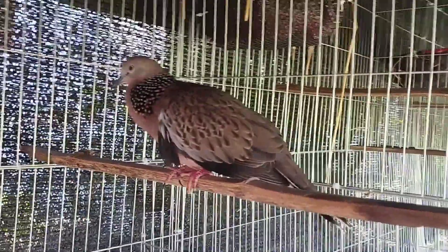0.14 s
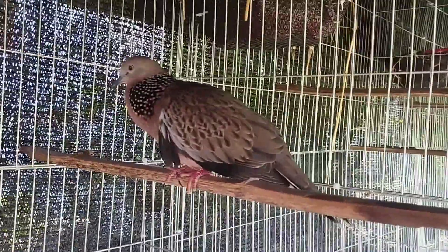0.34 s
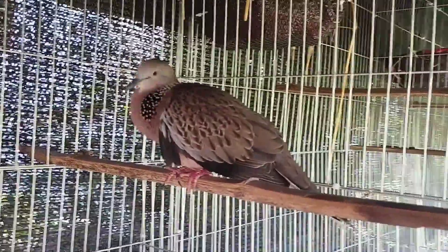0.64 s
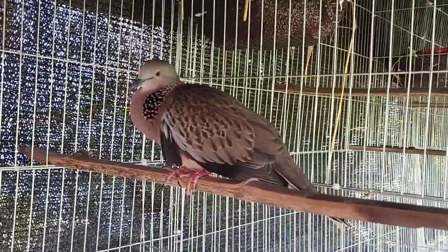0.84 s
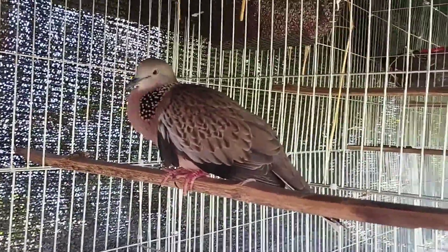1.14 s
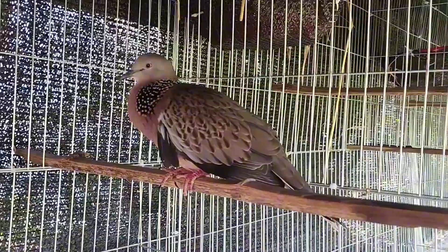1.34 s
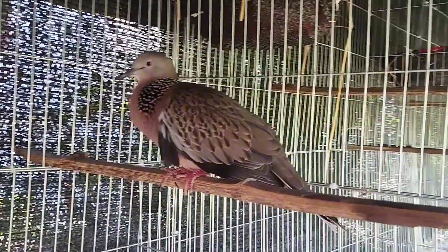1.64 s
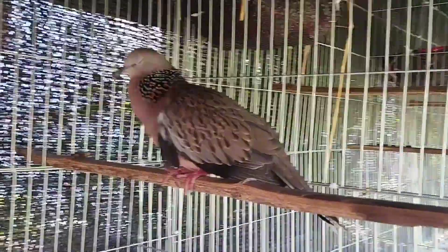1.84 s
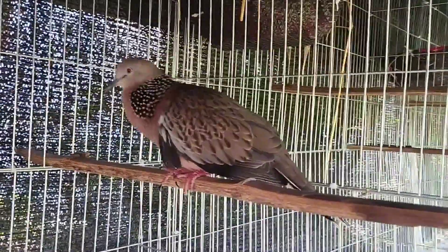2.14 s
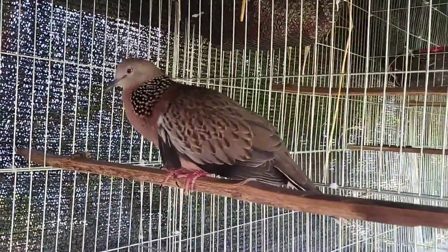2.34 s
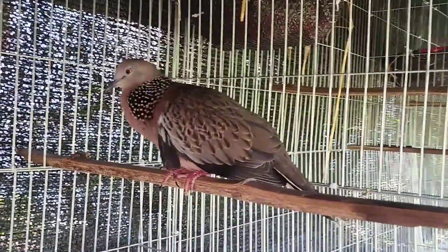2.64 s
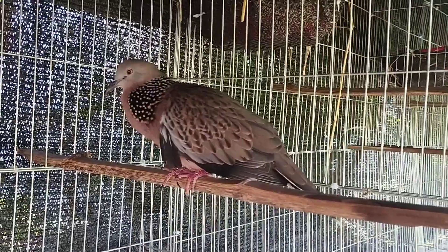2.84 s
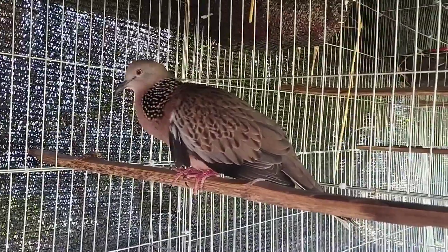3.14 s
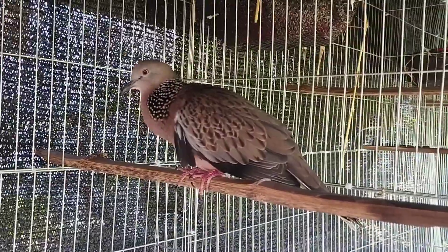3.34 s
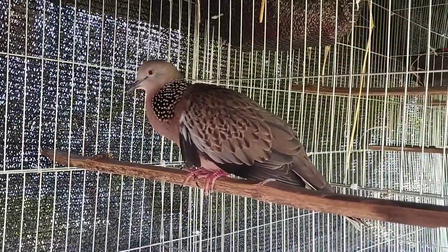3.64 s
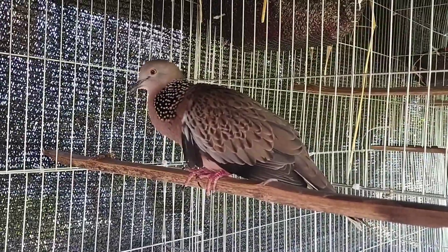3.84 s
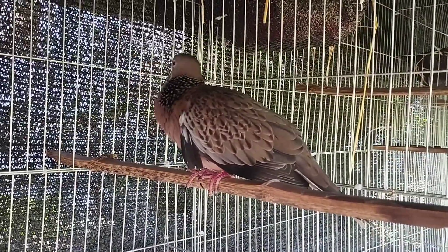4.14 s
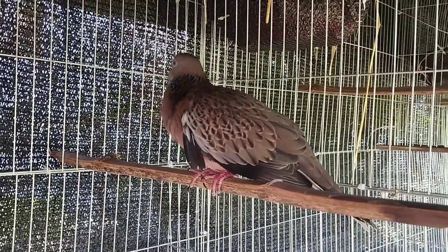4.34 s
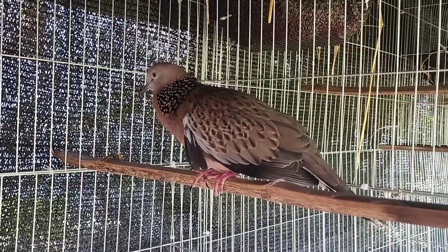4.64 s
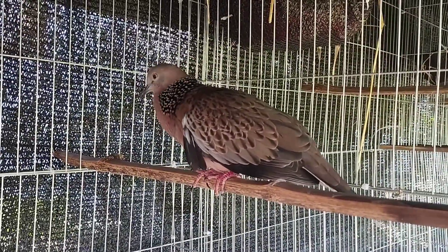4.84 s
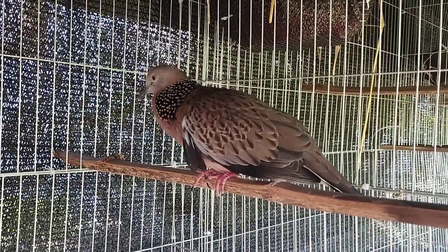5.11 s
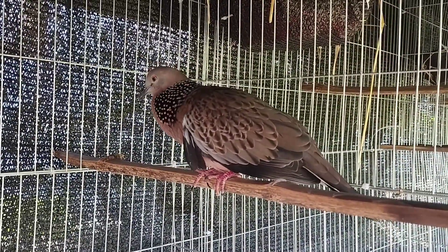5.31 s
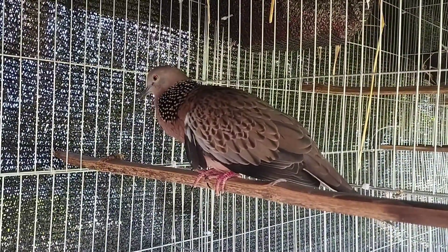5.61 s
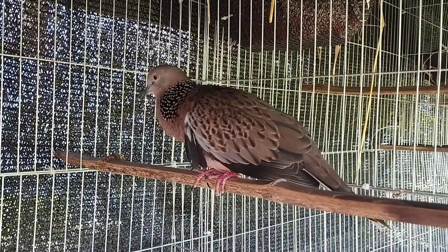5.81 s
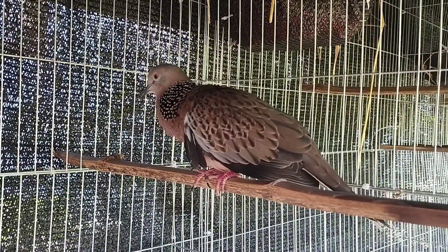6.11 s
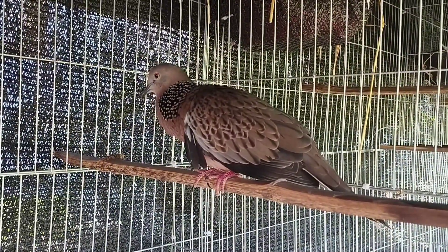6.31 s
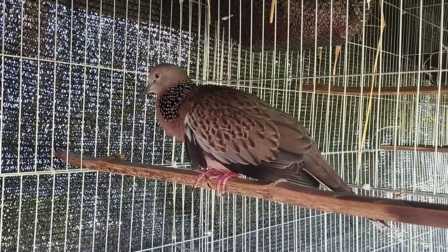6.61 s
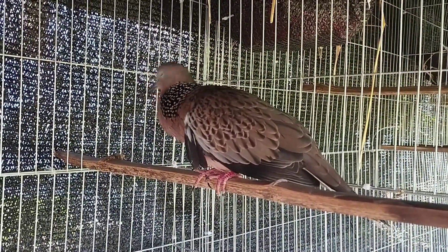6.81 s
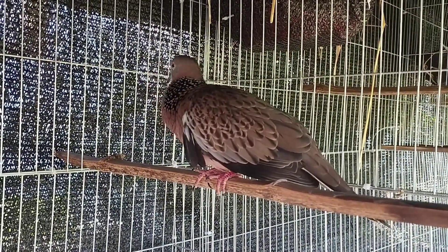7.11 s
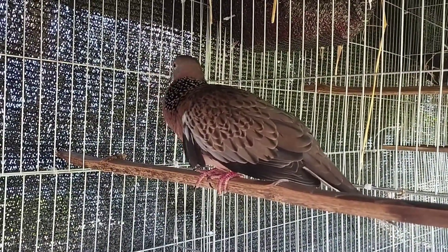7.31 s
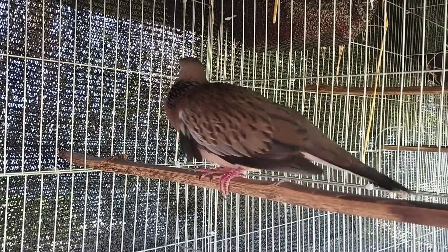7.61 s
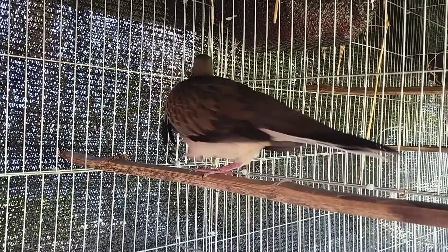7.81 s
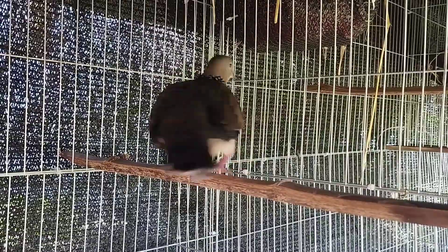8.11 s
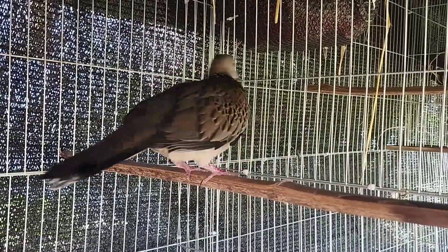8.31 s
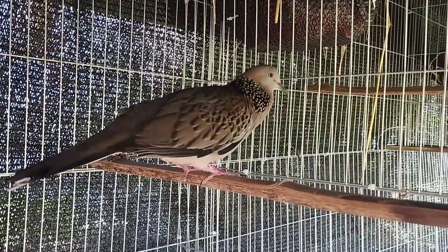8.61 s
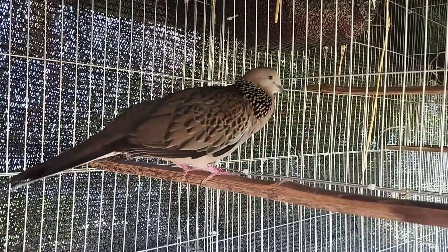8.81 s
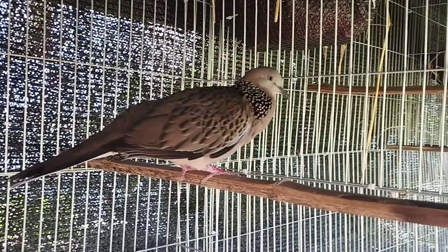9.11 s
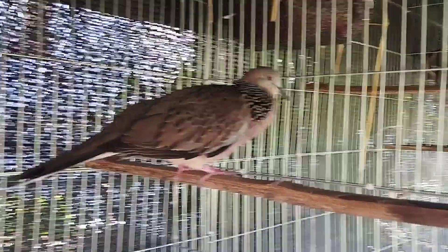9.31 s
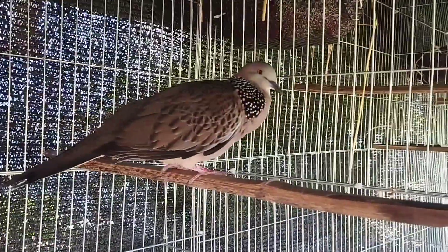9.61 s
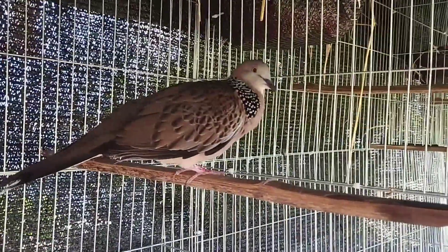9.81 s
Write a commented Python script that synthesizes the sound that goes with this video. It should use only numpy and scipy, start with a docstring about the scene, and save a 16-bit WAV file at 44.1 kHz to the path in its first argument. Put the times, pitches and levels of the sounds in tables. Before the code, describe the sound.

A spotted dove close by in an outdoor wire cage finishes a purring coo, then calls three two-note phrases: a short rolled note swelling upward, then a longer purr that sags in pitch. Soft low wind thumps shift between left and right, with few after the middle. Tiny wire ticks, faint distant chirps and a thin insect hiss fill the pauses. Stereo microphone, bird slightly left, short echo.

```python
"""A dove in an outdoor wire cage is heard first amid a long purring coo; cage wires tick as wind gusts set in.
Near 1.9, 4.5 and 8.6 s comes a rising rolled note, each time followed by a long purring one.
Its voice is a near sine that the syrinx chops into pulses; nearby walls ring on after it.
Gusts, low noise shaped apart for each microphone, last to 7.5 s; far birds, gliding sines, chirp between,
and one peeps six times from 6.7 s. Air noise and a thin insect band, both filtered noise, lie under it all."""
import sys
import numpy as np
from scipy import signal
from scipy.fft import rfft, irfft
from scipy.io import wavfile
from scipy.ndimage import uniform_filter1d

SR = 44100
rng = np.random.default_rng(int(sys.argv[2]) if len(sys.argv) > 2 else 0)


def voltage_ratio(level):
    """Linear amplitude factor for a level in decibels (scalar or array-like)."""
    return 10 ** (np.asarray(level, float) / 20)


def int16_out(signal):
    """Quantize to a 16-bit WAV file."""
    q = np.round(np.clip(np.atleast_2d(signal).T, -1, 1) * 32767)
    wavfile.write(sys.argv[1], SR, q.astype(np.int16))


N = 438794

# overtones escaping through the closed beak: [f/Hz, level relative to the tone/dB before waver and facing]
OVERTONES = [(900, -37), (1050, -29), (1250, -49), (1500, -51.5), (1950, -59), (2130, -62), (2300, -47),
             (2550, -62), (2800, -54), (3500, -65), (5000, -61.5), (5600, -66.5), (6150, -56.5),
             (6800, -76.5), (9000, -99)]
# where the bird is heard from: [t/s, left over right/dB, left ahead/ms,
# overtone level/dB as the head faces or turns away]
BEARING = [(0, 4.5, 0.14, -2), (2.4, 4, 0.18, 0.5), (5, 3.5, 0.16, -2.5), (8.5, 3, 0.022, -5.5),
           (9.95, 4, .01, -5.5)]
# rising notes: [start t/s, length/s, hump and trough level change/dB, crest level change/dB, dip t/s]
RISING_NOTES = [(1.915, 0.35, 0.5, 0.3, 2.1901), (4.476, 0.37, -0.5, -1, 4.7665),
                (8.551, 0.369, -3.5, 1, 8.8703)]
# purring notes: [start t/s, length/s, level change/dB, level gained by the end/dB,
# pitch ratio reached by the end, share of length at which the level's knee falls]
PURRING_NOTES = [(-.117, 0.54, -0.15, 1.36, 1.032, 0.77), (2.378, 0.54, -0.57, 1.65, 1.031, .78),
                 (4.954, 0.539, 0.1, 0, .985, 0.73), (9.037, 0.55, -0.4, 0.5, 1.03, 0.72)]


def rms_one(x):
    """Normalization to unit root mean square."""
    return x / np.sqrt(np.mean(x ** 2) + 1e-20)


def in_time(rows):
    """Linear interpolation of every column over the scene's time axis."""
    s, *columns = np.transpose(rows)
    return [np.interp(np.arange(N) / SR, s, column) for column in columns]


def at_hz(points, hz):
    """A spectral curve, interpolated on a logarithmic frequency axis."""
    curve_hz, value = np.transpose(points)
    return np.interp(np.log(hz), np.log(curve_hz), value)


def band(x, low_hz, high_hz):
    """Band-pass filtering with a maximally flat passband."""
    edges_hz = [low_hz, min(high_hz, SR / 2.2)]
    return signal.sosfilt(signal.butter(2, edges_hz, "band", fs=SR, output="sos"), x)


def drift(rate_hz):
    """Slow random fluctuation of unit rms: noise through a double-pole low-pass, at one value per 40 samples."""
    r = np.exp(-80 * np.pi * rate_hz / SR)
    white = rng.standard_normal(N // 40 + 2002)
    slow = signal.lfilter([1], [1, -2 * r, r * r], white)[2000:]   # the filter's start is dropped
    return np.interp(np.arange(N) / 40, np.arange(len(slow)), rms_one(slow))


def resonance(x, hz, width_hz):
    """A damped resonator: the pole radius sets its bandwidth and so its decay."""
    r = np.exp(-np.pi * width_hz / SR)
    zeros = [(1 - r * r) / 2, 0, (r * r - 1) / 2]
    poles = [1, -2 * r * np.cos(2 * np.pi * hz / SR), r * r]
    return signal.lfilter(zeros, poles, x + 1e-18)


def sides(pan_db):
    """Level difference between the channels, split evenly about the middle."""
    return voltage_ratio(np.multiply.outer([.5, -.5], pan_db))


def air():
    """Broadband noise as a sum of narrow bands, each with its own level, flicker and channel correlation."""
    # still air, far traffic and hiss: [f/Hz, relative level per Hz/dB]
    air_spectrum = [(18, -29), (30, 2), (75, -6.5), (390, -24), (624, -26), (833, -28), (901, -30),
                    (1780, -34.5), (4000, -35.5), (4810, -37.5), (5340, -42.5), (8110, -48.5),
                    (10800, -50.5), (12700, -52), (15600, -42)]
    # left-right likeness: [f/Hz, correlation]
    likeness = [(60, 0.71), (240, 1), (950, 0.03), (3770, 0.049), (15000, 0.17)]
    air_db = -58
    out, edges = 0, np.geomspace(30, 17000, 23)
    white = rng.standard_normal((2, 2, N))
    for k, (low, high) in enumerate(zip(edges, edges[1:])):
        mid, side = band(white[k % 2], low, high)
        hz = np.sqrt(low * high)
        alike = np.clip(at_hz(likeness, hz), -1, 1)
        gain = voltage_ratio(at_hz(air_spectrum, hz) + 0.27 * drift(3))
        out = out + gain * (np.sqrt(1 + alike) * mid + np.sqrt(1 - alike) * side * [[1], [-1]])
    return voltage_ratio(air_db) * rms_one(out)


def insects():
    """Narrow-band noise: a thin far hiss whose level wavers slowly."""
    # far insects: [t/s, level/dB before the waver]
    insect_level = [(0, -92), (5, -89), (6, -90.5), (7.5, -86), (8.6, -88.5), (9.95, -86)]
    centre_hz, width_hz, waver_db = 5420, 170, 0.86
    hiss = band(rng.standard_normal((2, N)), centre_hz - width_hz / 2, centre_hz + width_hz / 2)
    return voltage_ratio(in_time(insect_level)[0] + waver_db * drift(1.6)) * rms_one(hiss)


def wind_split(pan_db):
    """Power sharing between the microphones by their level difference, with a common lift of 4 dB."""
    return voltage_ratio(4.0) / np.sqrt(1 + voltage_ratio(np.multiply.outer([-2, 2], pan_db)))


def wind():
    """Turbulent pressure at each microphone: lumpy low noise in a deep and an upper band, swelled by gusts."""
    # wind between gusts: [t/s, deep level/dB before the common lift, left over right/dB]
    steady_wind = [(0, -53, 5.5), (.4, -57.5, 0.5), (.8, -51.5, 5), (1.05, -50, -2), (1.45, -44, -12),
                   (1.8, -46, -3.5), (2, -46, 6.5), (2.4, -53.5, 0), (3.3, -56, -2), (3.7, -53, 3),
                   (4.4, -58.5, 0.5), (5.2, -55, -3.5), (5.7, -57.5, -5.5), (5.95, -48.5, -10),
                   (6.3, -50.5, -2.5), (6.6, -54, -1), (7.7, -57.5, 2), (9.95, -62, 4)]
    # gusts: [peak t/s, deep level/dB and left over right/dB, upper rumble level/dB], levels before the lift
    gusts = [(.82, -48, 2.5, -58.5), (.89, -43, 4, -62), (1.125, -63, 2, -54.5), (1.18, -42, -12, -63),
             (1.33, -42, -12, -81), (1.44, -42, -20, -80), (1.66, -36, -17.5, -68), (1.97, -38.5, 14, -66),
             (2.271, -56, 20, -81), (2.631, -47.5, 38.5, -74), (2.77, -49, -5, -74.5),
             (3.51, -31.5, 21.5, -70.5), (4.78, -52, -7.5, -74.5), (5.32, -40.5, -12.5, -74.5),
             (5.819, -34, -24, -75), (6.051, -43.5, -17, -75), (6.15, -44, -16, -84), (6.21, -45, -11, -81),
             (6.39, -44.5, -11, -75), (7.01, -45, 4, -68.5), (7.46, -47.5, 1.5, -74.5)]
    gust_rise_s, gust_fall_s = 0.012, 0.027
    upper_db, upper_follows = -73.5, 0.092   # upper rumble, and the share of the wind's dB swing it follows
    level_db, pan_db = in_time(steady_wind)
    swing_db = level_db - level_db.mean()
    deep = (voltage_ratio(level_db) * wind_split(pan_db)) ** 2
    upper = (voltage_ratio(upper_db + upper_follows * swing_db) * wind_split(pan_db)) ** 2
    near = np.arange(-SR // 5, SR // 5)
    swell = np.exp(-(near / SR / np.where(near < 0, gust_rise_s, gust_fall_s)) ** 2)
    for s, gust_db, gust_pan_db, gust_upper_db in gusts:
        power = swell * wind_split(gust_pan_db)[:, None] ** 2
        span = round(s * SR) + near
        deep[:, span] += voltage_ratio(2 * gust_db) * power   # doubled dB, as powers add
        upper[:, span] += voltage_ratio(2 * gust_upper_db) * power
    lumps = voltage_ratio([3.2 * drift(18), 3.2 * drift(18)])
    white = rng.standard_normal((2, 2, N))
    low = np.sqrt(deep) * rms_one(band(band(white[0], 4.7, 70), 3.3, 120))
    high = np.sqrt(upper) * rms_one(band(band(white[1], 110, 370), 110, 370))
    return lumps * (low + high)


def birds():
    """Frequency modulation: gliding whistles, whose pitch a random shake, unlike on the two sides, spreads."""
    # far birds: [t/s, length/s, start f/Hz, end f/Hz, level/dB, roughness]
    chirps = [(.6, 0.085, 5300, 4400, -73, 1.26), (0.818, .25, 4180, 4230, -78.5, 0.79),
              (0.873, 0.14, 2360, 2314, -81, 0.05), (1.22, 0.046, 4270, 3000, -73.5, 1.05),
              (1.375, 0.15, 2650, 2440, -79.5, 0.5), (1.4, 0.24, 4400, 3670, -78, 0.74),
              (1.829, .05, 3900, 4100, -74.5, 0.27), (3.688, .09, 3910, 2610, -85, 0.4),
              (3.847, 0.046, 3660, 2600, -75, .5), (4.02, 0.054, 3200, 2510, -80, 0.57),
              (4.178, 0.079, 4240, 2800, -76, .6), (5.47, 0.071, 4420, 3400, -76.5, 0.04),
              (5.5, 0.067, 4310, 4130, -78.5, 0.08), (5.588, .05, 4550, 4050, -77, .3),
              (5.91, .06, 4830, 3580, -76, 0.42), (6.05, 0.09, 4530, 3740, -78.5, .4),
              (6.119, 0.096, 696, 657, -74.5, 0.06), (6.192, 0.08, 4580, 3010, -79, 0.42),
              (6.281, 0.06, 725, 707, -67.5, 0.08), (6.32, 0.018, 4300, 3800, -76, 0.42),
              (8.328, 0.025, 4300, 3910, -78, 0.46), (8.53, .045, 3910, 5050, -71, .8),
              (8.56, 0.064, 5060, 4040, -68.5, 0.8)]
    # one far bird peeps six times at a steady pace
    first_s, gap_s = 6.71, .202
    peep = .03, 4300, 3950, -78.5, .4   # the columns of the chirps from the length on
    peeps = [(first_s + k * gap_s, *peep) for k in range(6)]
    out, shake = np.zeros((2, N)), np.array([drift(170), drift(170)])
    for s, length, start_hz, end_hz, level_db, rough in chirps + peeps:
        span = round(s * SR) + np.arange(round(length * SR))
        pitch = np.linspace(start_hz, end_hz, len(span)) * (1 + 0.11 * rough * shake[:, span])
        whistle = 2 * np.sin(2 * np.pi * np.cumsum(pitch, axis=1) / SR)
        out[:, span] += voltage_ratio(level_db) * np.sqrt(np.hanning(len(span))) * whistle
    return out


def ticks():
    """Impulsive excitation: each tick is a quickly decaying crack of noise in a middle and a top band."""
    # cage wires: [t/s, level/dB before filtering, top band relative to middle/dB, left over right/dB]
    wire_ticks = [(0.2746, -44, 0.5, -8.5), (0.2874, -48, -1, 3), (0.3676, -50, 0.5, -12),
                  (0.503, -58.5, -5.5, 1), (0.6735, -54.5, 5.5, 5), (0.7018, -64.5, -3.5, -2),
                  (1.893, -59, -1, -11), (5.1861, -61, -2.5, -10), (7.6157, -59, -3.5, -3),
                  (7.8061, -58.5, 6.5, -5), (9.7352, -62, -2.5, 5)]
    t60_s = .022
    out, t = np.zeros((2, N)), np.arange(1500) / SR
    for s, level_db, treble_db, pan_db in wire_ticks:
        burst = rng.standard_normal(1500) * voltage_ratio(-60 * t / t60_s)
        crack = band(burst, 2000, 10000) + voltage_ratio(treble_db) * band(burst, 12500, 15000)
        at = round(s * SR)
        out[:, at:at + 1500] += voltage_ratio(level_db) * sides(pan_db)[:, None] * crack
    return out


def walls(x):
    """Reverberation: dense decaying echoes, partly unlike on the two sides, and resonant hollows."""
    # hollows near the cage that ring on after the voice: [f/Hz, t60/s, left level/dB, right level/dB]
    hollows = [(716, .17, -5, -5), (742, .2, -10, -12), (768, .16, -8, -7), (600, .2, -14, -14)]
    echo_db, echo_t60_s = -23, 0.18   # echo level before the sides are mixed
    t = np.arange(SR // 2) / SR
    tail = rng.standard_normal((2, len(t))) * voltage_ratio(-60 * t / echo_t60_s) * (t > .008)
    tail = (tail + 0.67 * tail[::-1]) / np.sqrt(np.sum(tail[0] ** 2))
    out = voltage_ratio(echo_db) * signal.fftconvolve(x[None], tail, axes=1)[:, :N]
    for hz, t60, *side_db in hollows:
        width_hz = np.log(1000) / np.pi / t60
        out += voltage_ratio(side_db)[:, None] * resonance(x, hz, width_hz)
    return out


def heard(x):
    """Differences of level and arrival time: the nearer microphone gets the bird louder and sooner."""
    pan_db, ahead_ms, _ = in_time(BEARING)
    late = np.interp(np.arange(N) - ahead_ms * SR / 1000, np.arange(N), x)
    return sides(pan_db) * [x, late]


def stretched(shape, start, length):
    """Time scaling: a note shape laid over its own start and length."""
    share, hz, level_db = np.transpose(shape)
    return share, start + length * share, hz, level_db


def notes():
    """Pitch and level contours: the times, pitches and levels of every note."""
    # rising note, a hump, a rolled trough and a crest:
    # [share of length, f/Hz before the pitch ceiling, level of the pulse tops/dB before each note's change]
    rising_shape = [(0, 470.3, -27.5), (.05, 582.7, -27.5), (.13, 629.7, -18), (.2, 601.1, -21),
                    (.3, 509.5, -32.5), (.4, 473, -36.5), (.6, 617.6, -20.5), (.74, 694.6, -13),
                    (.84, 765, -18.5), (.89, 750.8, -20), (.93, 733, -19), (.955, 684.6, -13.5),
                    (1, 377, -29)]
    # purring note, a quick lift and a long sag:
    # [share of length, f/Hz before each note's ratio, level of the pulse tops/dB before each note's change]
    purring_shape = [(0, 604, -18.5), (.028, 611.3, -23.5), (.052, 676, -15), (.11, 716.3, -15.5),
                     (.3, 696.5, -14.5), (.52, 670.2, -15.5), (.7, 628, -17), (.75, 610, -20.5),
                     (.8, 585.8, -25), (.93, 551, -26.5), (.972, 516, -29.5), (1, 378, -33)]
    trough, dip = .4, .795   # shares of the rising note
    sustain, fade, tail = 0.32, 0.76, .93   # the level's knee moves between these; the pitch keeps its course
    out = []
    for start, length, hump_db, crest_db, dip_s in RISING_NOTES:
        share, s, hz, level_db = stretched(rising_shape, start, length)
        s = np.interp(share, [0, trough, dip, 1], [start, start + trough * length, dip_s, s[-1]])
        out.append((s, hz, level_db + np.interp(share, [trough, dip], [hump_db, crest_db])))
    for start, length, first_db, gain_db, ratio, knee in PURRING_NOTES:
        share, s, hz, level_db = stretched(purring_shape, start, length)
        warped = np.interp(share, [0, sustain, knee, tail, 1], [0, sustain, fade, tail, 1])
        level_db = np.interp(warped, share, level_db)
        out.append((s, hz * ratio ** share, level_db + first_db + gain_db * share))
    return out


def amplitude_dips():
    """Quasi-periodic closures in the rolls, and one dip at each crest where tone and ringing hollow interfere."""
    # rolls, whose gaps shrink towards a settled length: [first closure t/s, last closure t/s, closures,
    # extra length of the first gap in settled gaps, closures to settle, depth/dB], before scatter
    rolls = [(0.0154, 0.272, 16, 0.49, 1.9, 13), (1.9936, 2.1605, 11, 0.044, 6, 17.5),
             (2.4052, 2.7315, 18, 1.43, 9.9, 14), (2.7796, 2.792, 2, .1, 5.8, 12),
             (4.5558, 4.7058, 10, .05, 4.1, 22), (4.98, 5.291, 17, 1.38, 9.2, 13),
             (8.64, 8.802, 11, 0.2, 7.4, 19), (9.0616, 9.3786, 18, 1.96, 8, 14),
             (9.4077, 9.4546, 4, .05, 4.6, 15)]
    crest_dip_db, scatter_s, scatter_db = 11, .0008, 3.8
    rows = [(note[-1], crest_dip_db) for note in RISING_NOTES]
    for first, last, many, extra, settle, depth_db in rolls:
        chance = rng.standard_normal((round(many), 2))
        gaps = 1 + extra * np.exp(-np.arange(round(many) - 1) / settle)
        done = np.cumsum(np.r_[0, gaps])
        s = first + (last - first) * done / done[-1] + scatter_s * chance[:, 0]
        rows += zip(s, depth_db + scatter_db * chance[:, 1])
    return np.transpose(sorted(rows))


def voice_pulses():
    """Amplitude modulation, by the syrinx and the crest dips: the envelope, the pitch sag and snap after each."""
    closing, opening = 0.2, 0.2   # shares of a pulse spent falling and rising
    sag_share, sag_s = 0.37, 0.0031   # pitch share lost at a full closure, time constant to regain it
    strength_db = .8   # spread of pulse strength
    shoulder, shoulder_s = 0.49, 0.026   # mean share of a pulse lost after its peak, and when the loss sets in
    t = np.arange(N) / SR
    s, depth_db = amplitude_dips()
    last = np.clip(np.searchsorted(s, t) - 1, 0, len(s) - 2)
    since, until = np.abs(t - s[last]), np.abs(s[last + 1] - t)
    gap = np.diff(s)[last]
    pulse = np.minimum(gap, .028)
    depth = 1 - voltage_ratio(-np.abs(depth_db))
    rise = 1 - depth[last] * np.exp(-(since / pulse / opening) ** 2)
    fall = 1 - depth[last + 1] * np.exp(-(until / pulse / closing) ** 2)
    sag = sag_share * uniform_filter1d(depth[last] ** 2 * np.exp(-since / sag_s), size=60)
    snaps = np.zeros(N)
    snaps[np.round(s * SR).astype(int)] = depth * rng.choice([-1, 1], len(s))
    chance = np.clip(rng.standard_normal((len(s), 2)), -2, 2)[last]
    lost = np.clip(shoulder * (1 + .5 * chance[:, 0]), 0, .7) * (1 - np.exp(-(since / shoulder_s) ** 3))
    rolling = gap < .035
    strength = np.where(rolling, voltage_ratio(strength_db * chance[:, 1]) * (1 - lost), 1)
    return rise * fall * uniform_filter1d(strength, size=90), sag, snaps


def beak_overtones(phase, pitch, span, jitter, waver, facing_db):
    """Harmonic series: partials 2 to 12 of the tone, weighted by what the beak lets out."""
    out = 0
    for k in range(2, 13):
        level_db = at_hz(OVERTONES, k * pitch) + np.roll(waver, k * SR // 2)[span]
        level_db = level_db + facing_db[span] * (k > 2)
        out = out + voltage_ratio(level_db) * np.sin(k * (phase + jitter[span]) + k * k)
    return out


def breath_puffs(phase, white):
    """Modulated flow noise: one puff on every cycle of the tone, coloured like the overtones."""
    breath_db = 13
    tint = voltage_ratio(at_hz(OVERTONES, np.fft.rfftfreq(len(phase), 1 / SR) + 1))
    return irfft(rfft(white * (1 + np.cos(phase))) * tint, len(phase)) * voltage_ratio(breath_db)


def clucks():
    """Short tone bursts: a soft 5 ms throat click before each note that starts within the scene."""
    lead_s, cluck_db = .02, -56
    out = np.zeros(N)
    click = np.hanning(220) * np.sin(2 * np.pi * 630.0 * np.arange(220) / SR)
    for note in RISING_NOTES + PURRING_NOTES:
        if note[0] > 0:
            at = round((note[0] - lead_s) * SR)
            out[at:at + 220] += voltage_ratio(cluck_db) * click
    return out


def throat(snaps):
    """Impulse response of cavities: the snaps ring in throat and crop."""
    # throat and crop resonances: [f/Hz, width/Hz, relative level/dB]
    cavities = [(963, 41, -37.5), (394, 71, -25.5), (790, 80, -34)]
    rings = 0
    for hz, width_hz, level_db in cavities:
        # dividing by the width makes the rings start equally high
        rings = rings + voltage_ratio(level_db) * SR / width_hz / np.pi * resonance(snaps, hz, width_hz)
    return signal.sosfilt(signal.butter(10, 1120, fs=SR, output="sos"), rings)


def dove():
    """Source and filter: a pulsed near sine behind a shut beak, with weak overtones, breath and throat rings."""
    ceiling_hz, tense_hz = 764, 733   # the voice tops out; above the second it neither sags nor snaps
    # a faint line about 122 Hz above the tone, beating with it like a ringing hollow
    line_above_hz, line_db = 122.2, -26
    envelope, sag, snaps = voice_pulses()
    facing_db = in_time(BEARING)[2]
    line_lead = 2 * np.pi * np.cumsum(line_above_hz * (1 + 0.059 * drift(15))) / SR
    waver, white = 2.2 * drift(20), rng.standard_normal(N)
    jitter = drift(120) * (.08 + .3 * uniform_filter1d(1 - envelope, size=900))   # rolled overtones turn grainy
    tone, upper, edges = np.zeros((3, N))
    for s, hz, note_db in notes():
        span = np.arange(max(round(s[0] * SR), 0), round(s[-1] * SR))
        aim = np.minimum(np.interp(span / SR, s, hz), ceiling_hz)
        slack = np.clip((tense_hz - aim) / 10, 0, 1)
        pitch = aim * (1 - slack * sag[span])
        phase = 2 * np.pi * np.cumsum(pitch) / SR
        fade = np.clip(np.minimum((span - span[0]) / 130, (span[-1] - span) / 600), 0, 1)
        level_db = np.interp(span / SR, s, note_db)
        push = voltage_ratio(level_db) * np.sqrt(2) * fade
        effort = push * envelope[span]
        edges[span] = push * slack * snaps[span]
        line = voltage_ratio(line_db) * slack * np.sin(phase + line_lead[span])
        tone[span] = effort * (np.sin(phase) + line)
        overtones = beak_overtones(phase, pitch, span, jitter, waver, facing_db)
        rough = slack * uniform_filter1d(1 - envelope[span], size=900)   # breath leaks while the voice rolls
        breath = voltage_ratio(facing_db[span]) * rough * breath_puffs(phase, white[span])
        even = voltage_ratio(-.12 * (level_db + 18))   # overtones swell less than the tone
        upper[span] = effort * even * (overtones + breath)
    # the shut beak holds back the treble
    closed = signal.sosfilt(signal.butter(4, 860, fs=SR, output="sos"), tone + clucks())
    voice = closed + upper + throat(edges)
    return signal.sosfilt(signal.cheby2(6, 40, 290, "high", fs=SR, output="sos"), voice)


def scene():
    """Superposition: the dove and its echoes over wind, air, ticks and far calls."""
    voice = dove()
    return air() + insects() + wind() + birds() + ticks() + walls(voice) + heard(voice)


def band_limit(x):
    """A steep low-pass at the top of the band."""
    return signal.sosfilt(signal.butter(12, 15760, fs=SR, output="sos"), x)


def record(dry):
    """Self-noise: the microphones add their own thin hiss at the top of the spectrum."""
    hiss_db = -85
    hiss = voltage_ratio(hiss_db) * rms_one(band(rng.standard_normal(dry.shape), 15000, 17000))
    return band_limit(dry + hiss)


dry = scene()
out = record(dry)
int16_out(out)
```